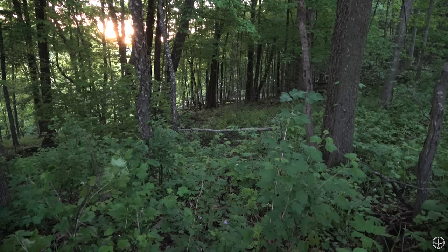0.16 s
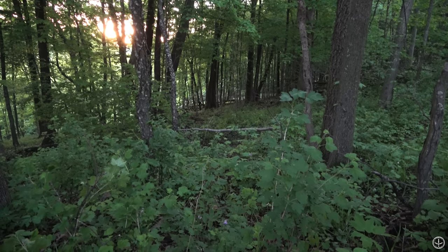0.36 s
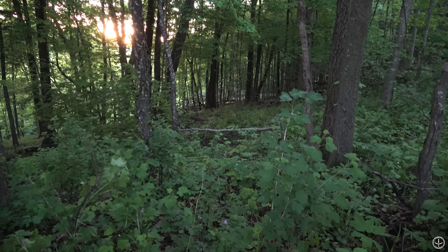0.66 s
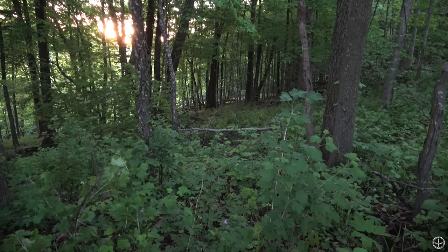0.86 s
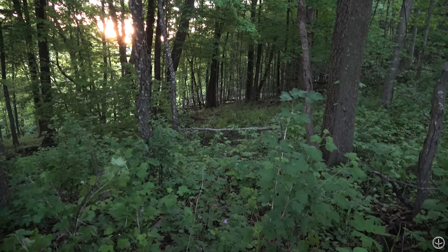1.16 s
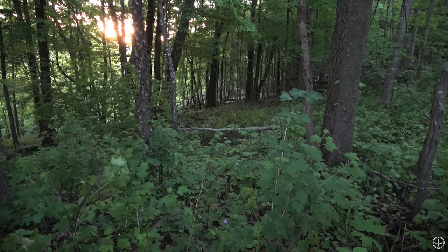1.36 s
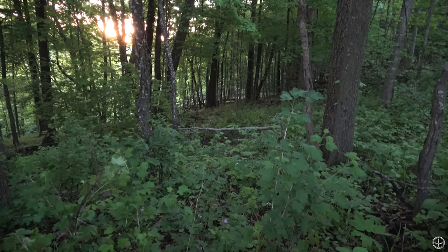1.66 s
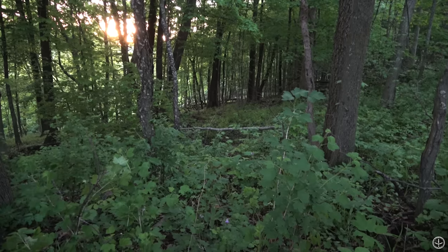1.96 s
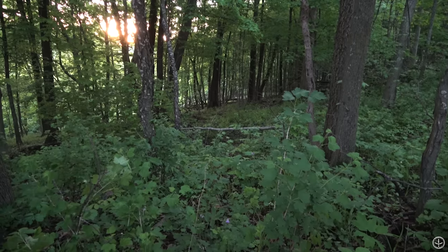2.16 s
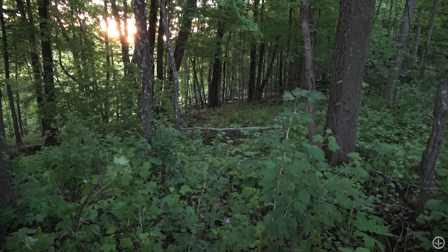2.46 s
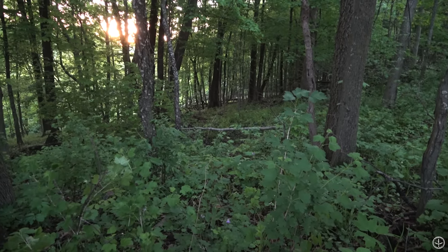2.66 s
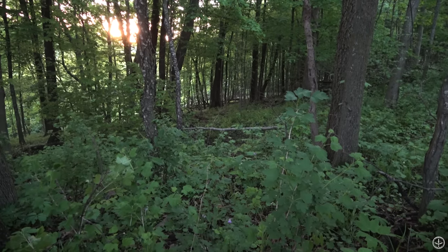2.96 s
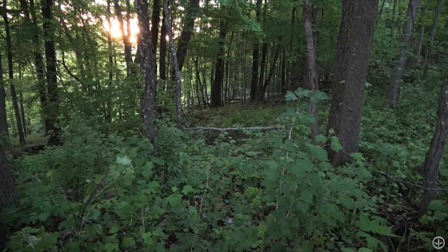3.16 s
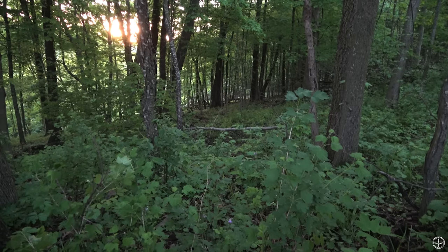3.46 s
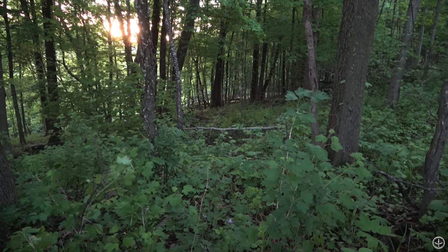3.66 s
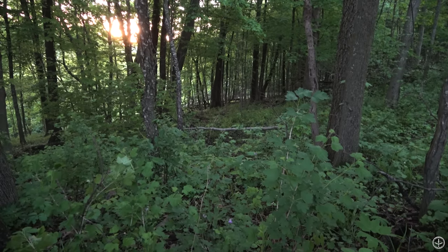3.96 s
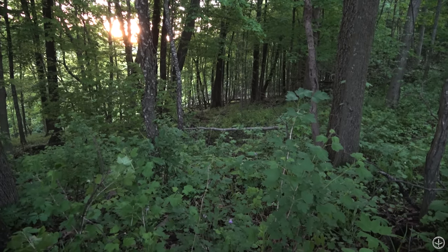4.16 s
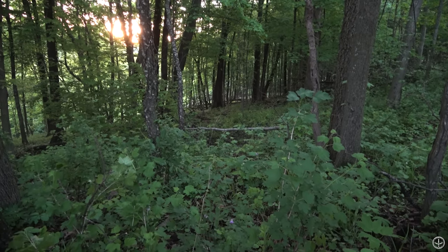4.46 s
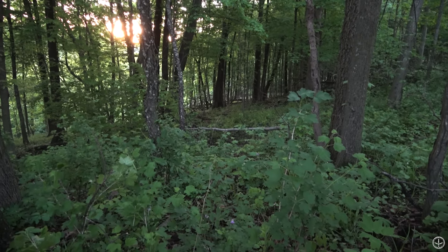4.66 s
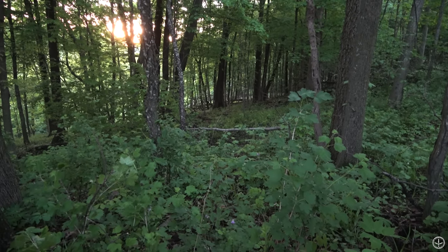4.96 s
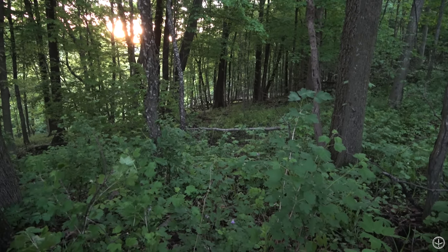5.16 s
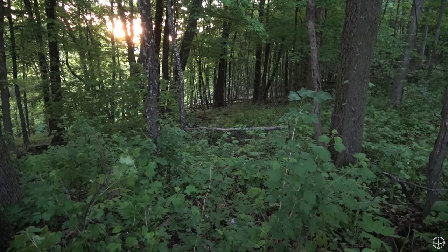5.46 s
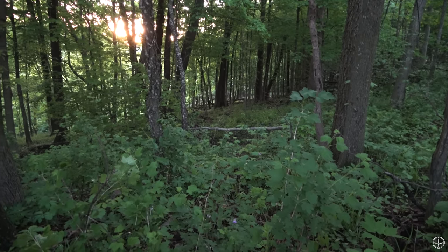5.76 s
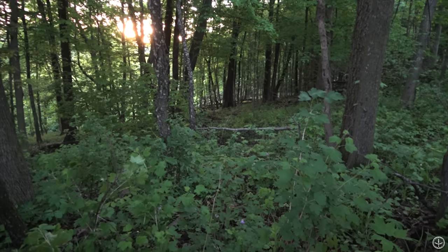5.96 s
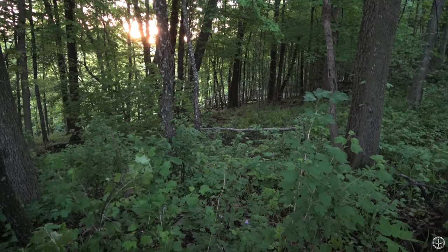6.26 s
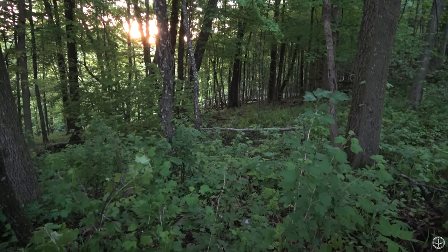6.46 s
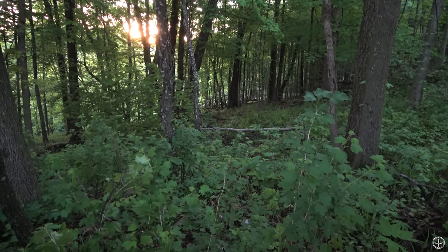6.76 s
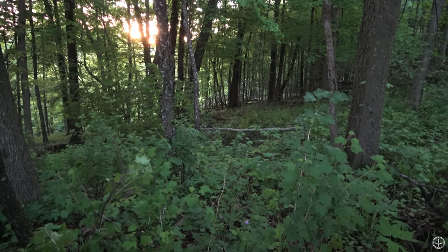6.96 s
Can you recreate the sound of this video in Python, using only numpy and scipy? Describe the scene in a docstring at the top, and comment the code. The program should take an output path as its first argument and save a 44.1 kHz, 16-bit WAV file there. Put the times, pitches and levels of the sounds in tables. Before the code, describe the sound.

A dawn wood of soft rushing air and fine hiss, lasting about seven seconds. From 0.1 to 0.9 s a far songbird repeats rapid high gliding notes, mostly as echo, above distant twitter. A far turkey gives four short, raspy, downward-breaking yelps at 0.6, 0.9, 1.1 and 1.4 s. Close to the microphone, the camera mount hums and thuds in small jolts, with a cluster of dry knocking creaks from 1.1 to 1.8 s. A nearer, clearer bird sings brisk phrases from 2.05 to 3.1 s. After a thinner passage, slurred whistles multiply from 4.4 to 6 s, echoing among trunks, and return at 6.4 to 6.9 s. Two creaks come around 5.25 s; soft scuffs occur at 2.6 s and repeatedly from 5.4 to 6.5 s. Deep quivering swells and fades throughout, strong near 0.5 s and at the end. A very faint distant drone wavers, briefly rising around 6.4 s.

```python
"""A leafy wood at dawn: two songbirds repeat their phrases and others whistle slurred notes among echoing trunks.
A distant turkey gives four short yelps, and far birds twitter over one another.
The calls are gliding sines, heard straight and as scattered echo; air in the leaves is coloured noise.
The camera's mount quivers, hums and creaks as it is turned in small jolts, which rumble at the microphone."""
import sys
import numpy as np
from scipy import signal
from scipy.fft import rfft, irfft, next_fast_len
from scipy.io import wavfile
from scipy.ndimage import uniform_filter1d, map_coordinates

SR = 44100
rng = np.random.default_rng(int(sys.argv[2]) if len(sys.argv) > 2 else 0)


def persist_wave(psi):
    """Save psi, clipped to +-1, as 16-bit WAV."""
    counts = np.round(np.clip(psi, -1, 1) * 32767).astype(np.int16)
    wavfile.write(sys.argv[1], SR, np.atleast_2d(counts).T)


N = 313110  # length in samples
T = np.arange(N) / SR  # seconds


def amp(db):
    """Decibels to gain."""
    return 10 ** (np.asarray(db) / 20)


def unit(x):
    """Scale to rms 1."""
    return x / np.sqrt(np.mean(x ** 2) + 1e-20)


def curves(rows):
    """One value per sample for each column after the time."""
    s, *columns = np.transpose(rows)
    return [np.interp(T, s, column) for column in columns]


def wobble(rate):
    """A smooth random curve through `rate` random knots a second."""
    knots = rng.standard_normal(int(N * rate / SR) + 4)
    return map_coordinates(knots, [T * rate])


def filtered(x, response):
    """Multiply the spectrum of x by a response of frequency in Hz."""
    size = next_fast_len(N + SR // 2)
    spectrum = rfft(x, size) * response(np.fft.rfftfreq(size, 1 / SR))
    return irfft(spectrum, size)[:N]


def noise(spectrum):
    """Noise of rms 1 coloured by (Hz, dB) points, joined on a log frequency scale."""
    f, db = np.transpose(spectrum)
    white = rng.standard_normal(N)
    return unit(filtered(white, lambda hz: amp(np.interp(np.log(hz + 1), np.log(f), db))))


def steady(x, span):
    """Even out the swells of x that last longer than span seconds."""
    power = uniform_filter1d(x * x, max(int(span * SR), 1))
    return x / np.sqrt(np.abs(power) + 1e-6)


def tone(hz):
    """A sine that follows a pitch curve."""
    return np.sin(2 * np.pi * np.cumsum(hz) / SR)


def add(track, s, sound):
    """Mix a sound into the track at s seconds."""
    part = track[max(round(s * SR), 0):][:len(sound)]
    part += sound[:len(part)]


def among_trees(call, share, t60, late_t60, late_db):
    """Part of a call arrives straight; a share of its power scatters off near trunks, then lingers in the deep wood."""
    t = np.arange(SR) / SR
    near_decay = amp(-60 * t / t60)
    deep_decay = amp(late_db - 60 * t / late_t60)
    onset = 1 - np.exp(-t / 0.0082)
    tail = rng.standard_normal(SR) * (near_decay + deep_decay) * onset
    share = np.clip(share, 0, 1)
    path = np.sqrt(share) * tail / np.linalg.norm(tail)
    path[0] += np.sqrt(1 - share)
    return signal.fftconvolve(call, path)


def whistle(s, length, pitches, db, remoteness, waver=0.0064, burr=0.061):
    """A note that bends through three pitches, straight and as echo; held notes are purer, wide glides burrier."""
    waver_rate = 330  # random pitch knots a second
    leaf_scatter_hz = 4740  # above this pitch the leaves block the straight path
    u = np.linspace(0, 1, int(length * SR))
    hz = np.polyval(np.polyfit([0, .5, 1], pitches, 2), u)
    depth = waver + burr * remoteness * np.ptp(hz) / pitches[1]
    drift = map_coordinates(rng.standard_normal(size=256), [u * length * waver_rate])
    note = amp(db) * tone(hz * (1 + depth * drift)) * signal.windows.tukey(len(u), .2)
    scattered = np.sqrt(np.clip(remoteness, 0, 1))  # share of the power
    straight_gain = np.sqrt((1 - scattered) / (1 + (hz / leaf_scatter_hz) ** 12))
    echo = among_trees(note, share=0.98, t60=0.65, late_t60=1.7, late_db=-3)
    out = np.zeros(N)
    add(out, s, note * straight_gain)
    add(out, s, np.sqrt(scattered) * echo)
    return out


def song(phrase, start, end, period, remoteness):
    """A bird repeats its phrase at a steady pace and begins no note after the end time."""
    out = np.zeros(N)
    for s in np.arange(start, end, period):
        for offset, length, *pitches, db in phrase:
            if s + offset < end:
                out += whistle(s + offset, length, pitches, db, remoteness)
    return out


def near_bird():
    """The nearer songbird: more of each gliding note comes straight to the microphone."""
    # notes: offset_s into the phrase, length_s, start_hz, middle_hz, end_hz, level_db before the trees
    phrase = [(0, .1, 3180, 3677, 4564, -51.5), (.165, .048, 5750, 4880, 4870, -50),
              (.279, .085, 3500, 4050, 5750, -48), (.388, 0.04, 3880, 3210, 2810, -49)]
    # when it sings and how far off: start_s, end_s, period_s, remoteness (0-1)
    timing = (2.054, 3.2, .524, 0.49)
    return song(phrase, *timing)


def far_bird():
    """The farther songbird: its gliding notes reach the microphone mostly as echo."""
    # notes: offset_s into the phrase, length_s, start_hz, middle_hz, end_hz, level_db before the trees
    phrase = [(0, 0.055, 5580, 5340, 4700, -55), (.122, .075, 4130, 3870, 3270, -59),
              (.245, 0.085, 2950, 3620, 5100, -54)]
    # when it sings and how far off: start_s, end_s, period_s, remoteness (0-1)
    timing = (.094, .95, .465, 0.82)
    return song(phrase, *timing)


def whistlers():
    """Other birds' single slurred notes, each a slightly arched glide."""
    # whistles: start_s, length_s, start_hz, end_hz, level_db before the trees
    notes = [(1.51, .15, 3830, 3950, -62.5), (2.862, 0.095, 2714, 2646, -56.5),
             (3.597, 0.091, 2665, 2090, -52), (4.053, 0.078, 2130, 2050, -56.5),
             (4.417, .052, 2280, 2760, -59.5), (4.502, .062, 2397, 2015, -48.5),
             (4.604, 0.16, 2240, 3460, -54), (4.71, .079, 3375, 3250, -62),
             (4.771, 0.085, 4110, 4364, -57.5), (4.898, 0.12, 2130, 2850, -49),
             (5.072, 0.076, 2980, 1935, -45), (5.173, 0.058, 2740, 2237, -48.5),
             (5.271, 0.19, 3570, 4470, -59.5), (5.376, 0.1, 4470, 4100, -58),
             (5.526, 0.08, 1956, 2070, -53), (5.559, 0.124, 4297, 4200, -54.5),
             (5.654, 0.106, 2820, 3110, -57.5), (5.896, 0.11, 2174, 2566, -49),
             (5.93, 0.16, 5585, 5460, -56), (6.402, 0.071, 3700, 3870, -61),
             (6.474, 0.077, 1942, 2884, -48.5), (6.645, 0.063, 2645, 2460, -53),
             (6.698, .06, 2464, 1930, -50), (6.772, .1, 2510, 1920, -52)]
    arch, remoteness = 0.1166, 0.73  # upward bow as a share of the glide; 0-1
    out = np.zeros(N)
    for s, length, first_hz, last_hz, db in notes:
        middle_hz = (first_hz + last_hz) / 2 + arch * abs(last_hz - first_hz)
        out += whistle(s, length, (first_hz, middle_hz, last_hz), db, remoteness)
    return out


def turkey(rasp=0.068):
    """Each yelp starts on a high note, then breaks downward; fast random pitch gives the rasp."""
    # distant yelps: start_s, level_db before the trees
    yelps = [(.598, -46.5), (0.859, -46), (1.094, -45.5), (1.4, -45)]
    out, t = np.zeros(N), np.arange(int(0.042 * SR)) / SR
    hz = np.interp(t, [0, .016, .024, .036], [1693, 1618, 1403, 1230])
    for s, db in yelps:
        yelp = tone(hz * (1 + rasp * wobble(558)[:len(t)])) * signal.windows.tukey(len(t), .5)
        add(out, s, amp(db) * among_trees(yelp, share=0.41, t60=0.25, late_t60=1.3, late_db=-9))
    return out


def creaks(high_hz=3200, low_hz=700, glide=0.00046, body_hz=420, body_db=-19, thump_hz=210, thump_db=-26):
    """Each slip sends a bending wave through the mount: treble arrives first, the low ring and a soft thump last."""
    # slips of the mount: start_s, knock_db, tick_db (both before the filters)
    slips = [(1.0926, -31.5, -48), (1.1865, -27, -45.5), (1.194, -34, -55), (1.21, -32, -60),
             (1.3555, -33, -47.5), (1.366, -33.5, -56), (1.3923, -29, -55), (1.457, -31, -60),
             (1.463, -31.5, -58), (1.5033, -26, -55), (1.509, -28, -48), (1.623, -26.5, -55),
             (1.6711, -27.5, -59), (1.6756, -29, -58), (1.680, -31.5, -62), (1.8083, -25.5, -49),
             (1.827, -34, -56), (5.224, -31, -45), (5.2675, -24, -46)]
    knocks, ticks, t = np.zeros(N), np.zeros(N), np.arange(SR // 15) / SR
    snap = np.exp(-t / .0025) * (1 - np.exp(-t / .0005))
    falling_hz = low_hz + (high_hz - low_hz) * np.exp(-t / glide)
    for s, knock_db, tick_db in slips:
        # every slip is tuned a little differently
        ring_tune, body_tune, thump_tune = np.exp(.14 * rng.standard_normal(3))
        ring = tone(ring_tune * falling_hz) * snap
        body = amp(body_db) * np.sin(2 * np.pi * body_hz * body_tune * t) * np.exp(-t / 0.013)
        thump = amp(thump_db) * np.sin(2 * np.pi * thump_hz * thump_tune * t) * np.exp(-t / 0.043)
        add(knocks, s, amp(knock_db) * (ring + body + thump))
        add(ticks, s, amp(tick_db) * rng.standard_normal(len(t)) * np.exp(-t / .0007))
    dull_knocks = filtered(knocks, lambda hz: 1 / (1 + (hz / 3400) ** 6))
    tinted_ticks = filtered(ticks, lambda hz: amp(np.interp(hz, [3450, 4900, 7840, 11000], [11, 11, 0, -25])))
    return dull_knocks + tinted_ticks


def rubs(width=0.018):
    """Short dull scuffs of coloured noise as the camera is handled."""
    # soft rubs: middle_s, level_db
    scuffs = [(2.56, -50), (5.441, -48), (5.6, -62), (5.879, -48.5), (5.99, -48.5), (6.04, -49),
              (6.14, -51.5), (6.32, -57), (6.54, -46.5)]
    pressure = sum(amp(db) * np.exp(-((T - s) / width) ** 2) for s, db in scuffs)
    return pressure * noise([(60, -30), (170, 10), (350, -4.0), (900, 2), (1500, -4.5), (3000, -13), (8000, -38)])


def jolt(s, hold):
    """A shake builds quickly, holds, and dies away."""
    attack_s, release_s = 0.026, 0.041
    before = np.maximum(s - T, 0)
    after = np.maximum(T - s - hold, 0)
    return np.exp(-before / attack_s - after / release_s)


def rumble():
    """Jolts and a tremble that swells and fades buffet the microphone and make the quivering mount hum."""
    # quivering of the mount, about fourteen times a second: time_s, level_db
    quiver_levels = [(0.0, -53), (0.1, -29.5), (0.28, -51), (0.43, -22), (0.57, -19.5), (1.58, -30),
                     (2.21, -22.5), (3.02, -35), (3.2, -25), (4.67, -39), (5.14, -26), (5.5, -37.5),
                     (5.59, -26), (5.99, -22.5), (6.09, -30), (7.02, -19.5), (7.1, -23)]
    # pace of the quivering: time_s, rate_hz
    quiver_rates = [(0, 13.1), (1.5, 14.5), (4.0, 14.75), (6.0, 14.1), (7.1, 14.5)]
    # shaking between the jolts: time_s, hum_db
    tremble = [(0, -50), (1, -41), (1.85, -44.5), (2.1, -54.5), (3, -52), (3.9, -53), (5.1, -47.5),
               (5.9, -44.5), (7.1, -47.5)]
    # jolts that shake the camera: start_s, hold_s, hum_db, thud_db
    jolts = [(0, 0.033, -34.5, -37), (0.248, 0.013, -38, -50), (0.358, 0.025, -33, -38),
             (0.502, 0.034, -37.5, -46), (0.773, 0.11, -27.5, -40), (1.095, 0.067, -34, -30.5),
             (1.205, .04, -32, -28), (1.403, 0.026, -25, -29), (1.499, 0.027, -33, -27),
             (1.654, 0.039, -37.5, -32), (1.827, 0.04, -36, -38), (2.572, .08, -39, -39),
             (2.757, 0.038, -37, -46), (2.98, 0.043, -37.5, -50), (3.148, .03, -39, -54),
             (3.356, .01, -46, -52), (3.63, 0.015, -40, -54), (4.138, 0.066, -44, -43),
             (4.32, 0.11, -39, -43), (4.705, 0.088, -42.5, -42.5), (5.01, 0.06, -43.5, -43),
             (5.25, 0.052, -34.5, -29.5), (5.728, 0.052, -35, -46), (6.152, 0.069, -35.5, -41),
             (6.37, 0.12, -42, -40), (6.55, .06, -43.5, -42.5)]
    # modes of the mount: pitch_hz, width_hz, level_db (relative)
    modes = [(75.2, 7.04, 1), (109.4, 6.86, -10), (166.8, 16, -26.5), (243, 25, -31.5)]
    # colour of the buffeting: pitch_hz, level_db (relative, per Hz)
    buffet = [(15, -4), (25, -1.5), (45, 0), (65, -11), (100, -11.5), (170, -25.5), (300, -34), (700, -68)]
    quiver = amp(curves(quiver_levels)[0]) * unit(tone(curves(quiver_rates)[0]))
    hum_level = amp(curves(tremble)[0])
    thud_level = hum_level * amp(2.5)  # buffeting of the tremble, against its hum
    for s, hold, hum_db, thud_db in jolts:
        push = jolt(s, hold)
        hum_level = np.maximum(hum_level, amp(hum_db) * push)
        thud_level = np.maximum(thud_level, amp(thud_db) * push)
    # each mode rings in a narrow band, unsteady in pitch and strength
    hum = unit(sum(amp(db + 3.1 * wobble(22)) * tone(hz + width / 2 * wobble(25)) for hz, width, db in modes))
    thud = noise(buffet)
    low = quiver + hum_level * steady(hum, span=0.21) + thud_level * steady(thud, span=0.14)
    return low * signal.windows.tukey(N, .003)  # brief fades at both ends


def chorus(rate=70, length=.028):
    """Far birds over one another: many short random glides a second, heard mostly as echo."""
    # spells of song: start_s, end_s, low_hz, high_hz, level_db while singing
    spells = [(0, 0.99, 2008, 5145, -59.5), (0, 1.4, 1346, 1683, -65.5), (1.001, 3.4, 2130, 3020, -75.5),
              (1.42, 1.65, 7340, 8250, -71), (2.571, 2.868, 7380, 8600, -72),
              (2.603, 4.2, 906, 1251, -65.5), (3.402, 4.593, 2110, 2823, -70),
              (4.597, 7.092, 1848, 3455, -68), (5.302, 6.307, 3223, 5890, -67)]
    out = np.zeros(N)
    for start, end, low_hz, high_hz, db in spells:
        twitter, count = np.zeros(N), int((end - start) * rate)
        for k, (late, a, b) in enumerate(rng.random((count, 3))):
            hz = low_hz + (high_hz - low_hz) * np.linspace(a, b, int(length * SR))
            add(twitter, start + (k + late) / rate - length, tone(hz) * np.hanning(len(hz)))
        # the root makes the level that of the spell, not of the whole scene
        out += amp(db) * unit(twitter) * np.sqrt((end - start) / T[-1])
    return among_trees(out, share=0.69, t60=0.58, late_t60=1.14, late_db=5)[:N]


def forest():
    """A soft fluttering rush of far trees, a fine hiss, and a faint distant drone of unsteady pitch."""
    # air in the trees, before its flutter: time_s, level_db
    breeze = [(0, -52.5), (1.26, -54), (2.12, -54.5), (3.1, -54.5), (3.5, -53.5), (5, -54), (6.6, -51.5),
              (7.1, -53.5)]
    # colour of the far rush: pitch_hz, level_db (relative, per Hz)
    rush_colour = [(88, -1.5), (150, -4), (263, -4.5), (296, -6), (525, -5), (584, -5.5), (636, -5),
                   (1050, -3.5), (1280, -6.5), (1900, -16), (2470, -15.5), (4180, -120)]
    # colour of the hiss: pitch_hz, level_db (relative, per Hz)
    hiss_colour = [(900, -23), (1700, 1.5), (2500, 2.5), (3500, -0.5), (4500, -3.5), (6000, -6), (9000, -8),
                   (12000, -9.5), (15600, -12)]
    # a far tone, before its wavering: time_s, level_db
    drone_levels = [(0, -72.5), (2.6, -70), (4.5, -67.5), (6.28, -70.5), (6.42, -56), (6.65, -75),
                    (7.05, -60)]
    rush = amp(curves(breeze)[0] + .5 * wobble(6)) * noise(rush_colour)
    drone = amp(curves(drone_levels)[0] + 1.6 * wobble(6.6)) * unit(tone(519 + 2.27 * wobble(12)))
    return rush + amp(-59.5) * noise(hiss_colour) + drone


def scene():
    """Everything reaches one microphone."""
    birds = near_bird() + far_bird() + whistlers() + turkey() + chorus()
    camera = creaks() + rubs() + rumble()
    return (birds + camera + forest())[None]


def record(dry):
    """The camera keeps nothing above its band limit."""
    top_hz = 15700
    return filtered(dry[0], lambda hz: hz < top_hz)[None]


dry = scene()
out = record(dry)
persist_wave(out)
```